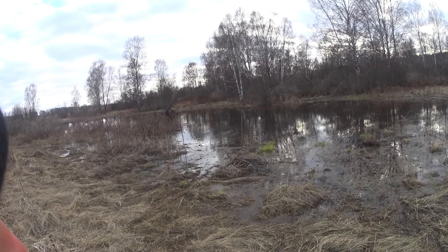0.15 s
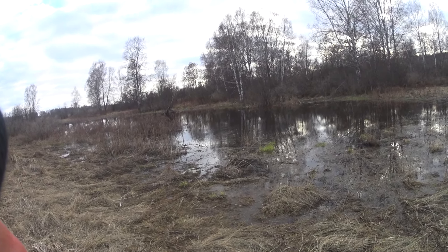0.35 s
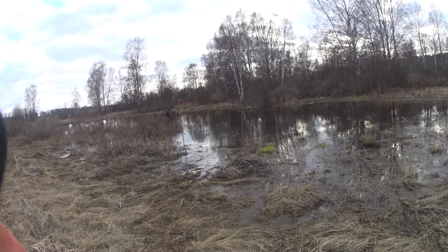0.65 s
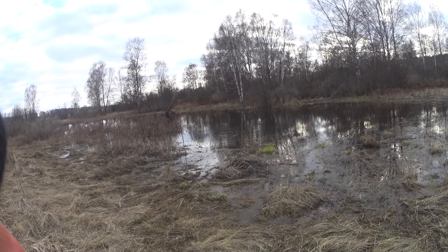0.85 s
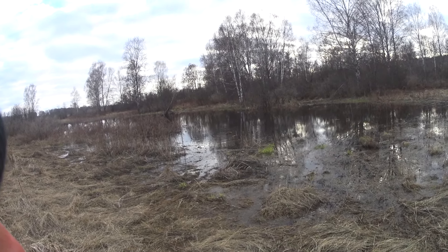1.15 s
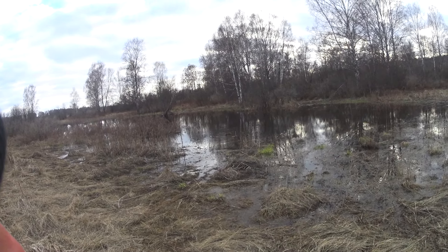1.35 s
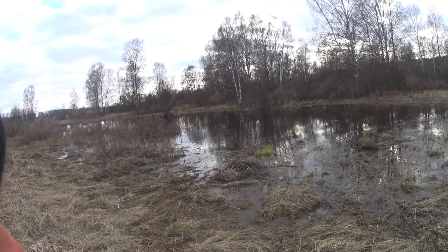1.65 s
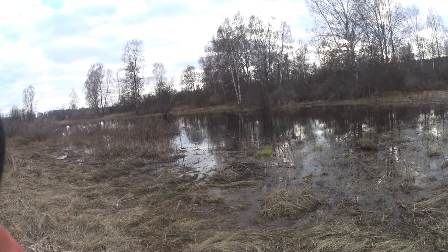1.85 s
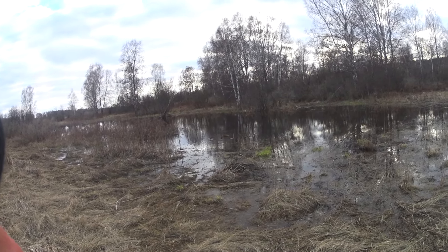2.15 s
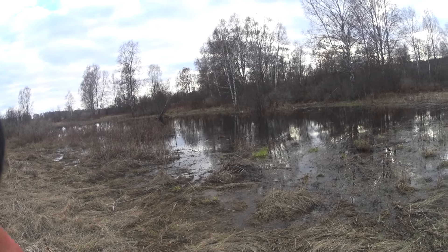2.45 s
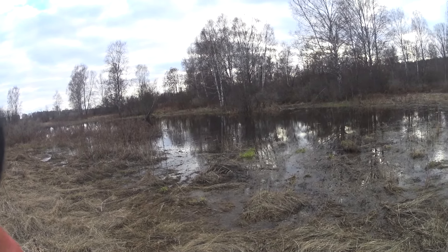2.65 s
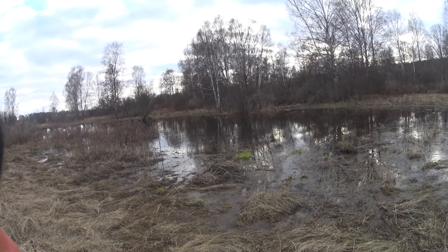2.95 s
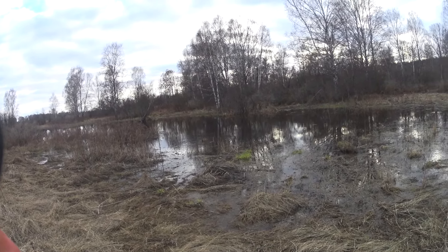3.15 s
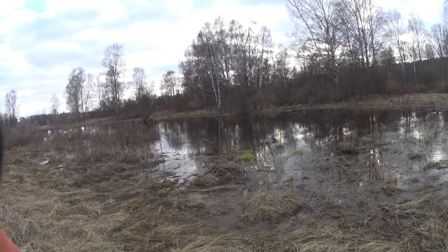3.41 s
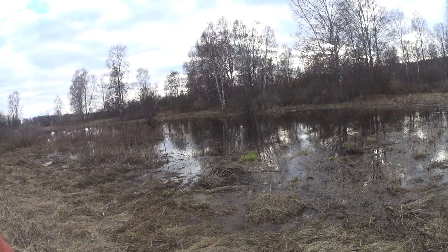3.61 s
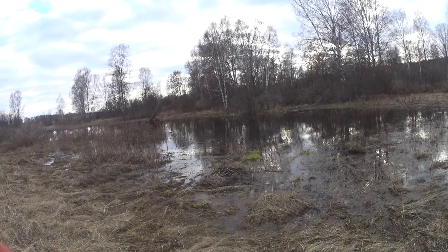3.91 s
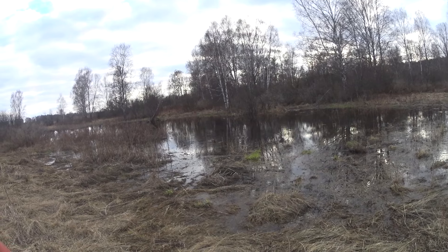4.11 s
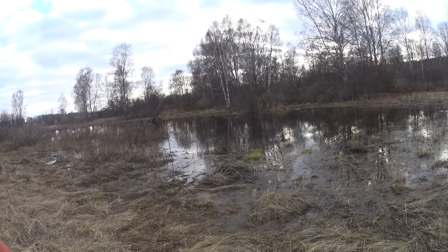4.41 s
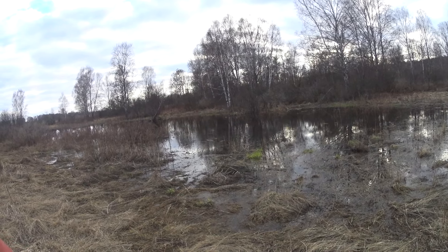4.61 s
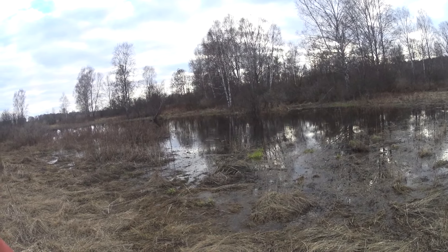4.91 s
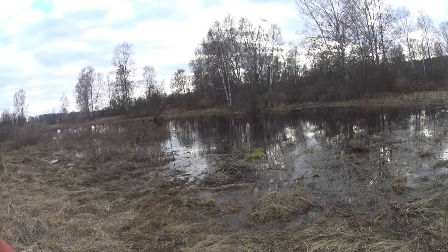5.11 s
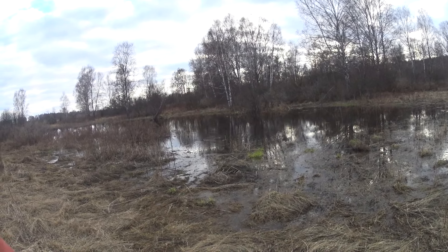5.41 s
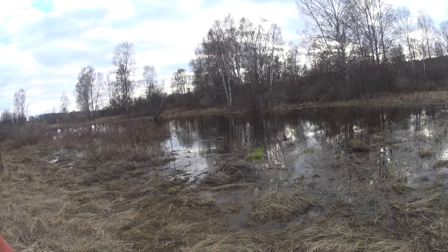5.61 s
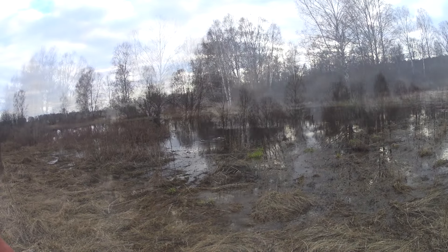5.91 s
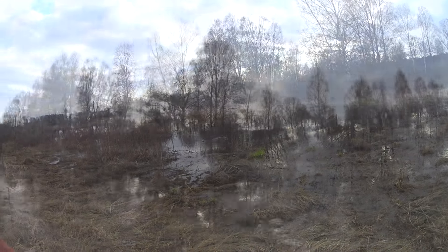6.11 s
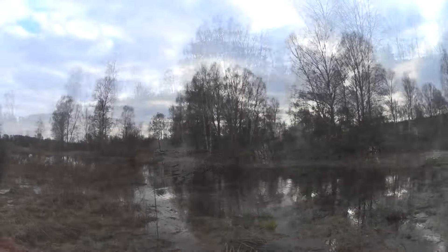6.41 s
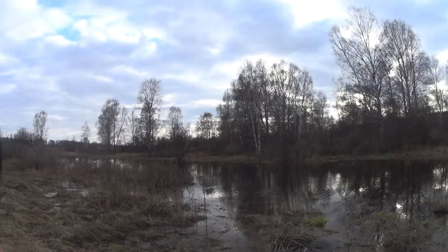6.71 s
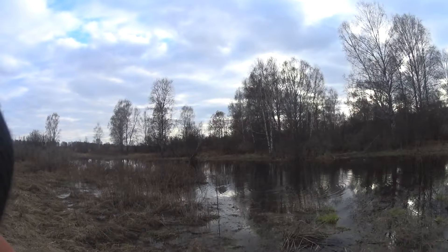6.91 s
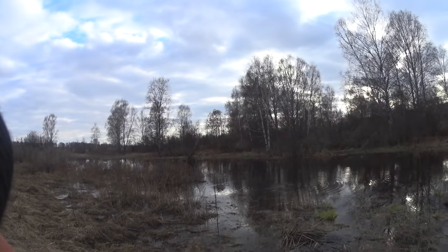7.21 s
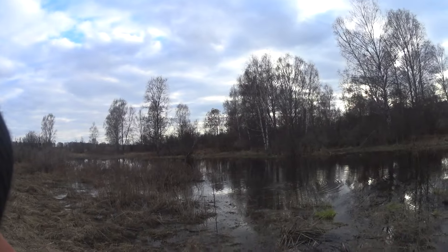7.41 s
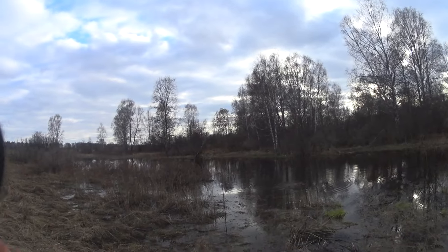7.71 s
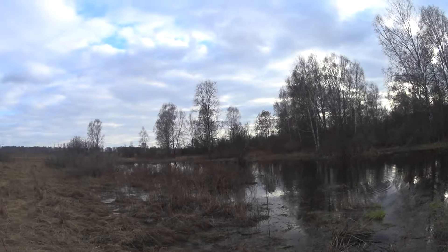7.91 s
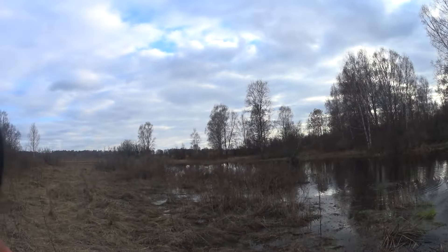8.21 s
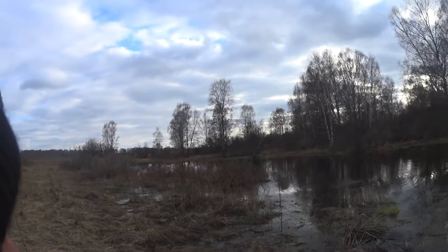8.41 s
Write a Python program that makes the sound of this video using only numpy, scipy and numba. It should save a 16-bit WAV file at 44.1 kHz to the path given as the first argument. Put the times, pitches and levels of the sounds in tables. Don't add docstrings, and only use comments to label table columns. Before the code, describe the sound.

Short, buzzy, nasal duck quacks dominate a quiet open-air stereo scene with a distant traffic drone and light hiss. Four come evenly from the left, then a pause with faint clicks at the microphone, a fifth with a dull thud just after, and a softer sixth. Brighter clicks mark a slow blend into stronger road noise, and three louder quacks finish near centre.

```python
import sys
import numpy as np
from scipy import signal
from scipy.fft import rfft, irfft, next_fast_len
from scipy.io import wavfile
from scipy.ndimage import uniform_filter1d
from numba import njit

SR = 44100
rng = np.random.default_rng(int(sys.argv[2]) if len(sys.argv) > 2 else 0)


def invert_db(x):
    u = np.asarray(x, float) / 20
    return 10 ** u


def dump(signal):
    limited = np.clip(np.atleast_2d(signal).T, -1, 1)
    pcm = np.round(limited * 32767).astype(np.int16)
    wavfile.write(sys.argv[1], SR, pcm)


N = 377055
T = np.arange(N) / SR


def unit(x):
    return x / np.sqrt(np.mean(x ** 2))


def on_log(hz, table):
    table_hz, table_db = np.transpose(table)
    return np.interp(np.log(hz + 1), np.log(table_hz), table_db)


def walk(rate):
    hold = int(SR / rate)
    steps = np.repeat(rng.standard_normal(N // hold + 1), hold)
    return 1.3 * uniform_filter1d(uniform_filter1d(steps, hold), hold)[:N]


@njit
def svf(x, hz, width):
    y, b, l = np.empty(len(x)), 0., 0.
    for i in range(len(x)):
        g, k = np.tan(np.pi * hz[i] / SR), width / hz[i]
        v = (b + g * (x[i] - l)) / (1 + g * (g + k))
        b, l, y[i] = 2 * v - b, l + 2 * g * v, k * v
    return y


def band(x, hz, width):
    return svf(x, np.minimum(hz * np.ones(len(x)), .4 * SR), float(width))


def modes(x, table, order):
    out = 0
    for k, (hz, width, db) in enumerate(table):
        ring = x
        for _ in range(order):
            ring = band(ring, hz, width)
        out = out + (-1) ** k * invert_db(db) * ring
    return out


def air(colour, side_db, lean_db, lanes_db):
    hiss_db = -65.5
    size = next_fast_len(N)
    hz = np.fft.rfftfreq(size, 1 / SR)
    mid, side = rfft(rng.standard_normal((2, size))) * invert_db(on_log(hz, colour))
    side = side * invert_db(on_log(hz, side_db) + 2)
    lean = invert_db(on_log(hz, lean_db) / 2)
    pair = np.array([(mid + side) * lean, (mid - side) / lean])
    octave = np.clip(np.log2(hz / 30 + 1e-9), 0, 8)
    bands = []
    for k in range(9):
        share = np.clip(1.5 - 2 * np.abs(octave - k), 0, 1)
        bands.append(invert_db(.8 * walk(6)) * irfft(pair * share, size)[:, :N])
    groups = bands[:2], bands[2:4], bands[4:6], bands[6:7], bands[7:]
    return sum(invert_db(db + 1) * unit(sum(g)) for g, db in zip(groups, lanes_db + [hiss_db]))


# frequency in Hz, level in dB per Hz.
COLOUR_1 = [(12, -53.5), (20, -18), (48, -10), (75, -4.5), (100, -6), (130, -19), (221, -12), (355, -15.5),
            (439, -12), (969, -9), (1400, -20), (1690, -27), (2260, -35), (2940, -43.5), (11000, -53.5),
            (14300, -76), (22000, -120)]
COLOUR_2 = [(12, -46), (20, -28.5), (85, -6), (179, -8.5), (246, -7.5), (280, -6), (312, -3.5), (395, -2),
            (572, 0.5), (1020, -5.5), (1170, -6.5), (1560, -13.5), (2080, -24), (2940, -30), (11000, -39.5),
            (14300, -91), (22000, -120)]
# frequency in Hz, side level minus middle level in dB.
WIDTH_1 = [(60, -39), (110, -17), (190, -16), (350, -13), (630, -14.5), (1130, -13), (2030, 1.5), (3640, 2),
           (6550, -2), (11800, 0)]
WIDTH_2 = [(60, -31), (110, -23), (190, -19.5), (350, -16), (630, -18.5), (1130, -13), (2030, 3.5),
           (3640, -2.5), (6550, -4.5), (11800, -2)]
# frequency in Hz, left minus right in dB.
BALANCE_1 = [(60, -1), (110, 1), (190, 0.0), (350, 0.0), (630, -0.5), (1130, -2.5), (2030, -0.5),
             (3640, 0.0), (6550, -0.7), (11800, 1)]
BALANCE_2 = [(60, 0.5), (110, -1.5), (190, 0.5), (350, -0.5), (630, -1.5), (1130, -4), (2030, -10.5),
             (3640, -1), (6550, -0.5), (11800, 1)]
# time in seconds, nearness in dB.
ROAD_NEARNESS = [(0, -1.5), (.6, -2.5), (1.2, -1.5), (1.9, -1.5), (2.6, -2.5), (3.1, -0.5), (3.6, 0),
                 (4.2, 1.5), (4.8, 2), (5.3, 1.7), (5.8, 1.5), (6.3, -.5), (6.8, 2), (7.2, 1), (7.7, 0.5),
                 (8.1, -.5), (8.55, -0.5)]
# level at the first stand in dB, at the second in dB,
# dB gained per dB of nearness, own swell in dB.
ROAD_PARTS = [
    (-54, -47.5, 2.5, 1.1),
    (-57.5, -44, -0.44, .8),
    (-48, -39.5, 0.8, 0.43),
    (-61.5, -53.5, 0.24, 1.3),
]


def far_road(fade):
    near_db = np.interp(T, *np.transpose(ROAD_NEARNESS))
    first, second = (
        [part[k] + part[2] * near_db + part[3] * walk(3.03) for part in ROAD_PARTS] for k in range(2))
    first_air = air(COLOUR_1, WIDTH_1, BALANCE_1, first)
    second_air = air(COLOUR_2, WIDTH_2, BALANCE_2, second)
    return np.sqrt(1 - fade) * first_air + np.sqrt(fade) * second_air


# frequency in Hz, level at the first stand in dB, level at the second in dB.
MOTORS = [(157.7, -66, -53), (276, -79, -52.5)]


def hums(fade):
    out = 0
    for hz, first_db, second_db in MOTORS:
        phase = 2 * np.pi * np.cumsum(hz * (1 + 0.0182 * walk(12))) / SR
        level_db = first_db + fade * (second_db - first_db) + 1.3 * walk(4)
        out = out + invert_db(level_db) * np.sin(phase)
    return out


# time in seconds, frequency in Hz, level in dB, seconds to die by 60 dB.
KNOCK = (4.93, 62, -37, .6)


def thump():
    s, hz, db, t60 = KNOCK
    t = np.maximum(T - s, 0)
    return invert_db(db - 60 * t / t60) * np.minimum(t / 0.045, 1) * np.sin(2 * np.pi * hz * t)


# time in seconds, peak in dB, low ring in dB, high ring in dB, middle ring in Hz.
HAND_CLICKS = [(2.7894, -49, 10, -20, 5920), (2.8959, -38.5, -6, -9, 4840), (3.1594, -55, -2, 1, 4750),
               (3.1894, -58, -5, -17, 4060), (3.31, -58, -9, 13, 4850), (5.6045, -40.5, -21, -1, 6500),
               (5.6884, -49, 1, -10, 4900), (5.9055, -44, -2, -11, 4500), (5.9144, -47, 2, -4, 6370),
               (5.9511, -27.5, -3.5, -4, 6450), (6.0844, -67, 7, -7, 5640), (6.1534, -49, 10, -7, 4260),
               (6.208, -16.5, 3, -5, 6300), (6.216, -27.5, -2, -22, 4580), (6.2246, -40, 10, -9, 5190)]


def clicks():
    out, size = np.zeros((2, N)), 600
    pan_db = -8
    t = T[:size]
    for s, db, low_db, high_db, hz in HAND_CLICKS:
        burst = rng.standard_normal((2, size)) * t * np.exp(-t / 0.00064)
        burst[1] = 0.12 * burst[0] + 0.37 * burst[1]
        rings = [(2400, 1600, low_db), (hz, 5000, 0), (10000, 1600, high_db + 8.5)]
        hit = np.array([modes(b, rings, order=2) for b in burst])
        middle = np.abs(modes(burst[0], rings[1:2], order=2)).max()
        a = int((s - .0005) * SR)
        out[:, a:a + size] += hit / middle * invert_db(db + np.array([[pan_db], [-pan_db]]) / 2)
    return out


def voice_pulses(t, hz, start, end, main_hz, beat):
    break_s, break_scatter, edge_s, edge_scatter = .012, .008, .02, .013
    limp_late, limp_db, return_limp_db = .35, 30, 95
    gust, hoarse = .009, .8
    beats = np.interp(np.arange(1, 60) - .7, np.cumsum(hz) / SR, t, right=99)
    chance = rng.standard_normal((59, 2)).T
    wobble = break_scatter * np.exp(-((beats - beat[0]) / break_s) ** 2)
    start_edge = np.exp(-((beats - start) / edge_s / 2) ** 2)
    end_edge = np.exp(-((beats - end) / edge_s) ** 2)
    scatter = np.where(beats < beat[0], *beat[1:3]) + wobble + edge_scatter * (start_edge + end_edge)
    limp = np.where(beats < beat[0], *beat[3:]) + 2 * wobble
    swing = (-1) ** np.arange(59)
    beats = beats + (scatter * chance[0] + limp_late * limp * swing) / 170
    size = invert_db(scatter * 70 * chance[1] + limp * swing * limp_db)
    keep = beats < end
    lags = np.arange(len(t))[:, None] - (beats[keep] - t[0]) * SR
    pulses = np.sinc(lags) @ size[keep]
    puff_shape = signal.lfilter([1], [1, -np.exp(-1 / (.003 * SR))], np.abs(pulses))
    puffs = puff_shape * rng.standard_normal(len(t))
    round_trip = 4 * SR / np.interp(beats[keep], t, main_hz)
    return_size = (size * invert_db(limp * swing * return_limp_db))[keep]
    returned = np.sinc(lags - round_trip) @ return_size
    breath = (gust + hoarse * np.interp(t, beats, scatter)) * puffs
    return pulses, puffs, pulses + .5 * returned + breath


REST_HZ = 1780
# frequency in Hz, level in dB, share of the bill's movement from 0 to 1.
WINDPIPE = [(841, -10.5, 0.42), (1212, -3, 0.66), (1772, 6, 0.81), (2099, 2, 0.85), (2384, -4, 0.75)]


def throat_sound(drive, main_hz, low_db, high_db, bill_hz, bill_db):
    rings = []
    for hz, db, share in WINDPIPE:
        width = 170 * hz / REST_HZ * 1.63 ** (hz < 1400)
        level_db = db + (low_db + 12.0) * (hz < 1400) + high_db * (hz > 2000)
        rings.append((hz * (main_hz / REST_HZ) ** share, width, level_db))
    rings.append((bill_hz * (main_hz / REST_HZ) ** .3, 350, bill_db))
    throat = band(modes(drive, rings, order=1), 2110, 4800)
    return throat / np.sqrt(uniform_filter1d(throat ** 2, size=900) + 0.015 * np.mean(throat ** 2))


# frequency in Hz, width in Hz, level in dB.
RASP_RINGS = [(3880, 590, 6), (4900, 990, 6.5), (5590, 430, 5.5), (6500, 1640, -0.5)]
# frequency in Hz, width in Hz, level in dB.
BREATH_RINGS = [(7760, 990, -16), (10300, 5000, 3)]


def rasp_sound(drive, puffs, age, main_hz, palate_db, air_db):
    mottle = [np.interp(age, np.arange(8) * .035, 2 * row) for row in rng.standard_normal((4, 8))]
    rings = []
    for (hz, width, db), wander_db in zip(RASP_RINGS, mottle):
        level_db = db + palate_db * (hz < 4300) + wander_db
        rings.append((hz * (main_hz / REST_HZ) ** .3, width, level_db))
    rasp = modes(drive + .016 * puffs, rings, order=2)
    breath = modes(drive + .04 * puffs, BREATH_RINGS, order=2)
    return unit(rasp + invert_db(air_db - 4.0) * breath)


def quack(call, pitch, bill, turn, colour, beat):
    (start, end, db, swell_db, pan_db), (first_hz, top_hz, rise_s, last_hz) = call, pitch
    open_hz, open_s, drop_hz, bill_hz = bill
    (jump_s, jump_db, upper_db, low_db), (rasp_db, chest_db, bill_db, air_db, palate_db) = turn, colour
    a = int(start * SR)
    t = T[a:a + int((end - start + .05) * SR)]
    age, left = t - t[0], np.maximum(end - t, 0)
    full = np.tanh((t - jump_s) / .003) / 2
    closing = np.exp(-left / 0.004)
    effort_db = db - swell_db * left / (end - start) - 20.5 * np.exp(-age / 0.0084) - 6.5 * closing
    hz = first_hz + (top_hz - first_hz) * np.sin(np.pi / 2 * np.minimum(age / rise_s, 1)) ** 1.2
    hz = hz + (last_hz - top_hz) * np.clip((age - rise_s) / (end - start - rise_s), 0, 1) ** 1.5
    main_hz = open_hz + (1202 - open_hz) * np.exp(-(age / open_s) ** 0.92)
    main_hz = main_hz - drop_hz * (1 + np.tanh((t - beat[0]) / 0.0035)) / 2
    muffle = np.exp(-age / 0.022)
    low_db = low_db + 10.5 * muffle + 4 * full
    dark_db = -10.5 * np.exp(-age / 0.021)
    rasp_db = rasp_db - 19.5 * np.exp(-age / 0.021) + 4 * closing
    chest_db = chest_db + 5 * muffle
    pulses, puffs, drive = voice_pulses(t, hz, start, end, main_hz, beat)
    throat = throat_sound(drive, main_hz, low_db, upper_db * full + dark_db, bill_hz, bill_db + dark_db)
    rasp = rasp_sound(drive, puffs, age, main_hz, palate_db, air_db)
    chest = unit(band(band(pulses, 2.4 * hz, 320), 2.3 * hz, 320))
    onset = np.minimum(age / 0.0021, 1)
    shut = np.exp(-np.maximum(t - end, 0) / 0.047)
    mix = throat + invert_db(rasp_db) * rasp + invert_db(chest_db) * chest
    return a, onset * shut * invert_db(effort_db + jump_db * full) * mix, pan_db


def ports(x, pan_db):
    share = np.tanh(pan_db * np.log(10) / 40)
    lead = 0.19 * (band(x, 790, 1100) - band(x, 2300, 1200))
    treble = .75 * np.roll(band(band(x, 7500, 12000), 7500, 12000), 3)
    side = 0.82 * share * band(x, 1830, 800) + lead + treble
    return np.array([x + side, x - side])


# start in seconds, end in seconds, full effort in dB, swell over the call in dB,
# left minus right in dB.
CALLS = [
    (.034, 0.223, -29, 4, 13),
    (.71, .905, -25, 4, 13.5),
    (1.406, 1.599, -24, 6.5, 17),
    (2.193, 2.371, -23.5, 5.5, 16),
    (4.76, 4.908, -27, -0.5, 15),
    (5.7, 5.855, -38, 13.5, 14),
    (6.343, 6.535, -19.5, 9.5, 3),
    (7.057, 7.232, -22, 1.5, 1.5),
    (7.707, 7.894, -20, 3.5, -3),
]
# first pulse rate in Hz, top rate in Hz, time to the top in seconds,
# last rate in Hz.
CALL_PITCH = [(138.7, 170.5, .14, 169), (137, 173, .16, 173), (143.8, 168, .12, 166),
              (147.7, 180, .115, 175), (134.5, 162, .065, 162), (159, 173.6, .09, 170),
              (140.4, 180.5, .125, 177), (148.3, 175.5, 0.13, 171), (145.7, 177.6, .125, 176.5)]
# throat resonance when open in Hz, time to open in seconds, drop at the break in Hz,
# bill ring in Hz.
CALL_BILL = [(1906, 0.038, 130, 2980), (1850, 0.03, 118, 2960), (1806, 0.028, 0, 3190),
             (1940, 0.029, 50, 3270), (1796, 0.031, 0, 3340), (1910, 0.018, 0, 3170),
             (1898, 0.028, 124, 3300), (1864, 0.016, 6, 3460), (1830, 0.026, 95, 3240)]
# time in seconds, jump in dB, gain of the upper rings there in dB,
# low rings in dB.
VOICE_JUMPS = [(.168, 4, 5.1, -8), (.8, 2.5, 4.5, -9), (1.552, -1.5, 1, -7.5), (2.295, -1.4, 1.5, -8),
               (4.86, 1, -1, -9), (5.8, 0, -2, -14), (6.43, 3, 2.5, -8), (7.14, 0.4, -2.5, -10),
               (7.805, 2.5, 1.5, -7.5)]
# rasp, chest, bill ring, air and palate ring, all in dB.
HEAD_COLOUR = [(-33, -16, -15, 4, -1), (-28.5, -19.5, -13, 3, 10), (-25, -19, -16, -8, 0.5),
               (-22.5, -17, -18, -6.5, 3), (-24.5, -18.5, -17.5, -8, 1), (-23.5, -18, -15, -3, 9),
               (-27, -20.5, -21.5, -5, -5), (-23, -17, -26, -1.5, -1), (-19.5, -20, -19.5, -3, -1.5)]
# time in seconds, period scatter before and after (0 to 1),
# long-short alternation before and after (0 to 1).
BEAT_BREAKS = [(.142, .003, .004, 0, .006), (.805, .003, .003, 0, .028), (1.495, .003, .005, 0, .03),
               (2.312, .003, .005, 0, .01), (4.8, .014, .017, .015, .02), (5.7, .002, .002, 0, 0),
               (6.425, .003, .002, 0, 0), (7.145, .008, .003, .025, 0), (7.79, .005, .002, 0, 0)]


def duck():
    voice, pan_db = np.zeros(N), np.zeros(N)
    for rows in zip(CALLS, CALL_PITCH, CALL_BILL, VOICE_JUMPS, HEAD_COLOUR, BEAT_BREAKS):
        a, v, p = quack(*rows)
        voice[a:a + len(v)], pan_db[a:a + len(v)] = v, p
    woods_db, woods_t60_s, woods_late_s = -20.5, 1.47, 0.065
    t = T[:SR]
    tail = rng.standard_normal((2, SR)) * invert_db(-60 * t / woods_t60_s) * np.clip(t / woods_late_s - .2, 0, 1)
    tail[1] = -.3 * tail[0] + tail[1]
    echo = signal.fftconvolve(band(voice, 2770, 2700)[None], tail / np.sqrt(SR / 10), axes=1)[:, :N]
    return ports(voice, pan_db) + invert_db(woods_db) * echo


# start in seconds, end in seconds.
CROSS_FADE = (5.864, 6.99)


def scene():
    fade = np.interp(T, CROSS_FADE, (0, 1))
    return far_road(fade) + hums(fade) + thump() + clicks() + duck()


def band_limit(x):
    return signal.sosfilt(signal.butter(12, 12370, fs=SR, output="sos"), x)


def record(dry):
    size = next_fast_len(N)
    edge = np.clip((11000 - np.fft.rfftfreq(size, 1 / SR)) / 160 + .5, .003, 1)
    mix = irfft(rfft(dry, size) * edge, size)[:, :N]
    return band_limit(mix)


dry = scene()
out = record(dry)
dump(out)
```